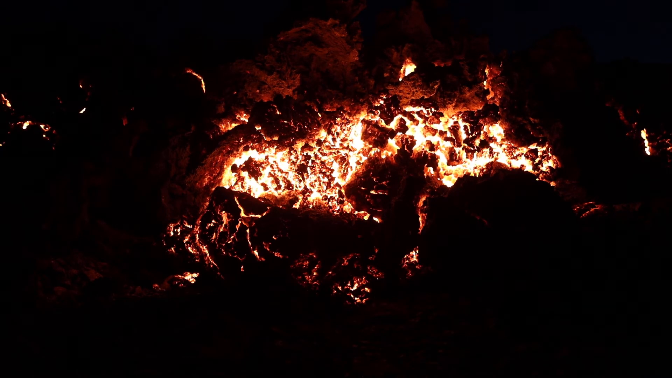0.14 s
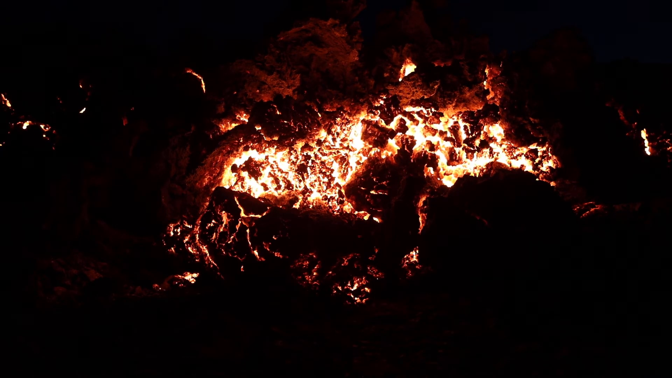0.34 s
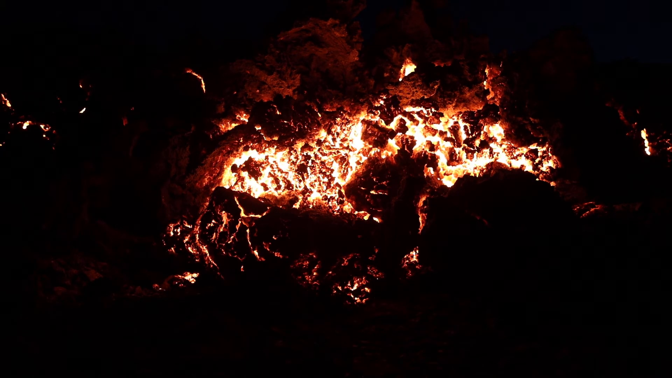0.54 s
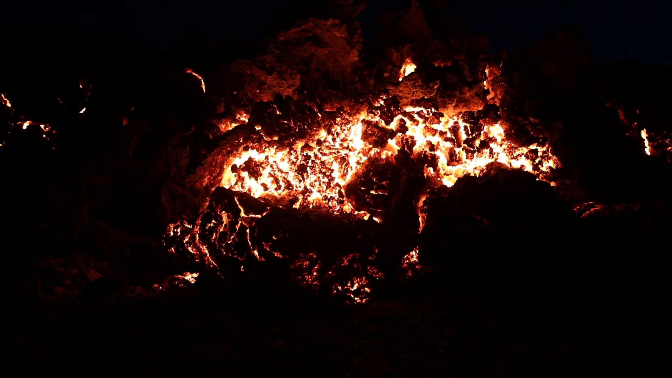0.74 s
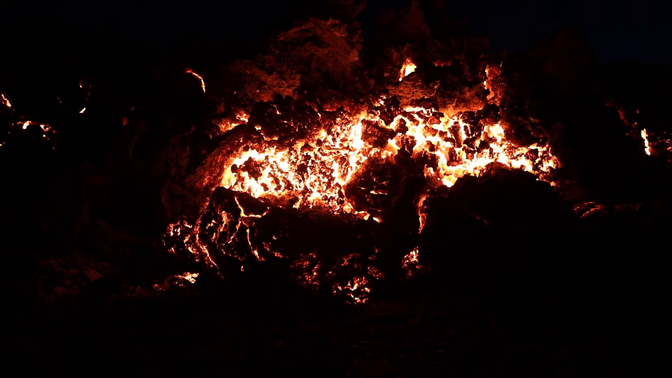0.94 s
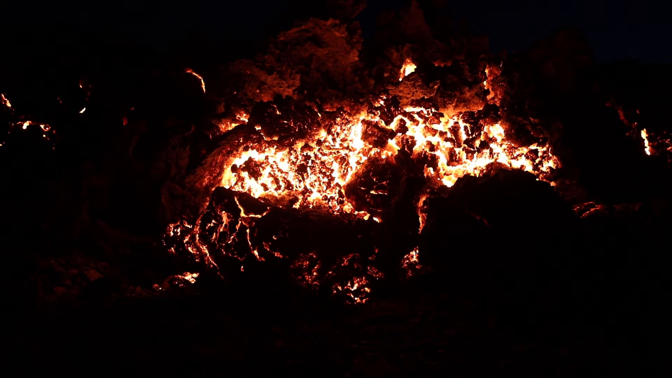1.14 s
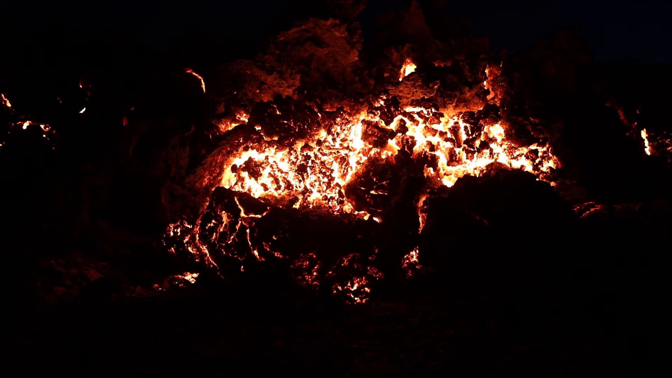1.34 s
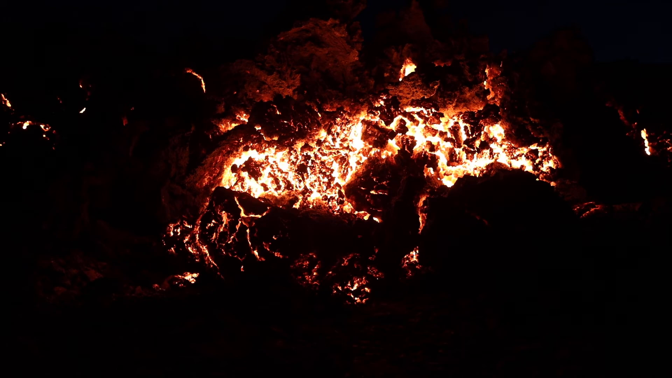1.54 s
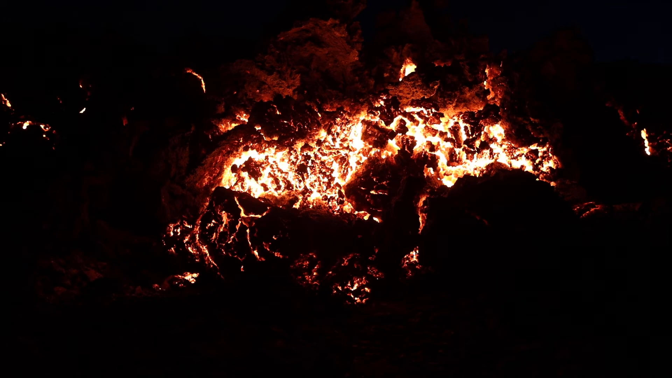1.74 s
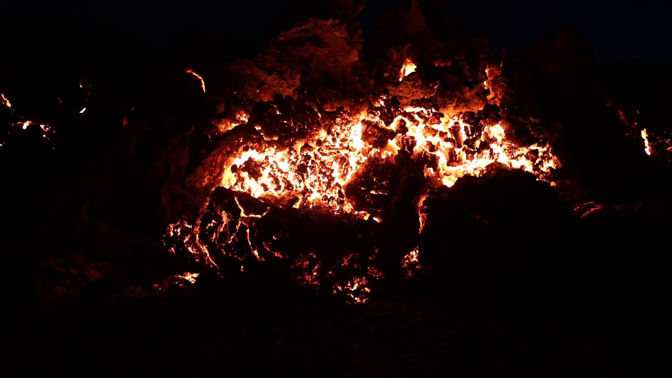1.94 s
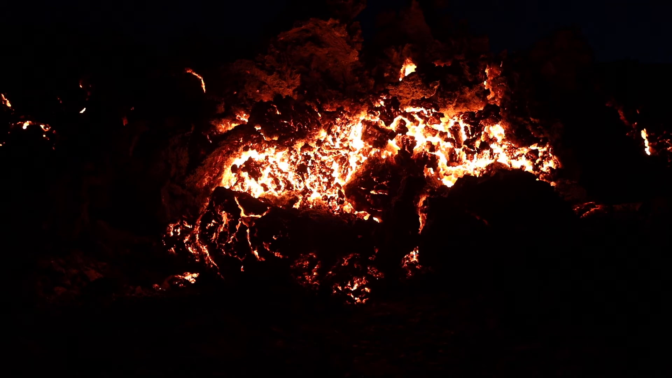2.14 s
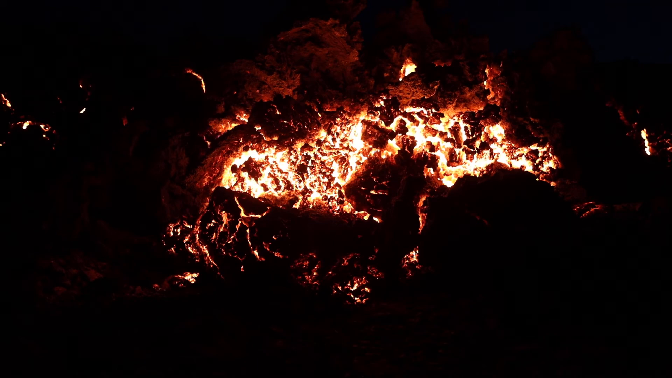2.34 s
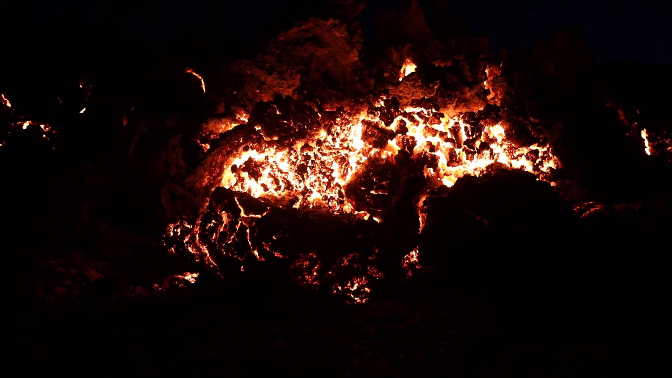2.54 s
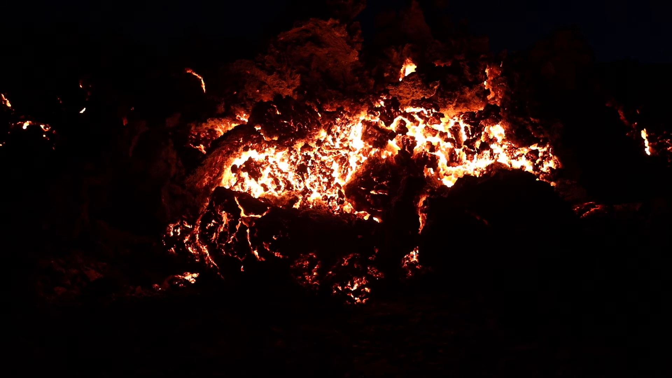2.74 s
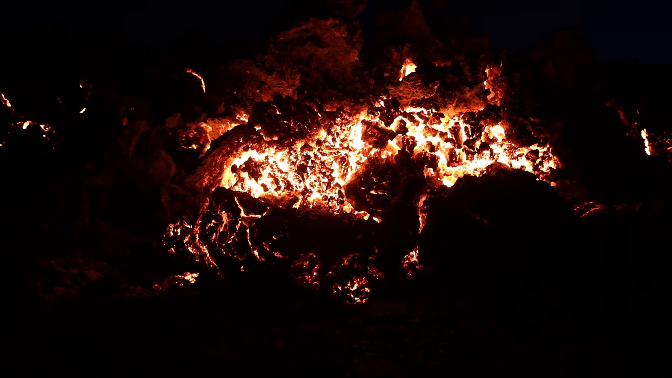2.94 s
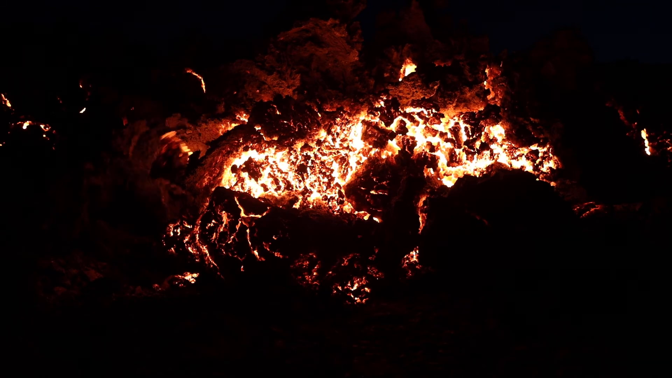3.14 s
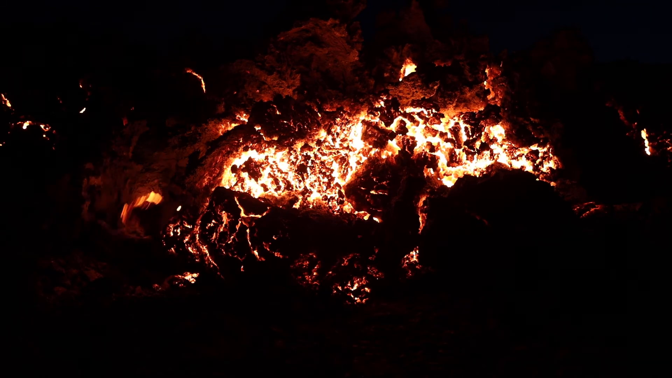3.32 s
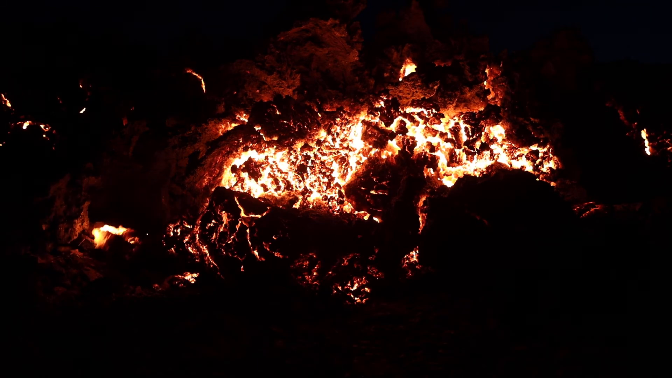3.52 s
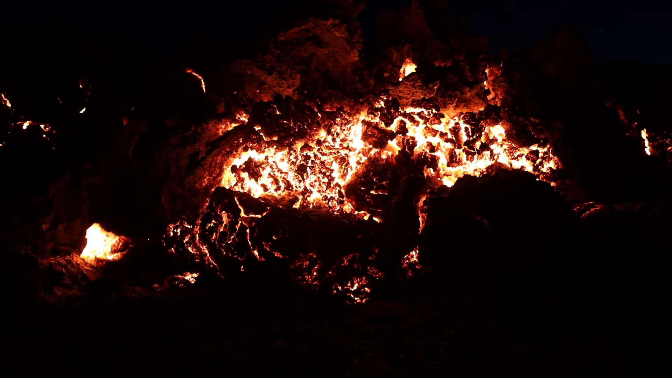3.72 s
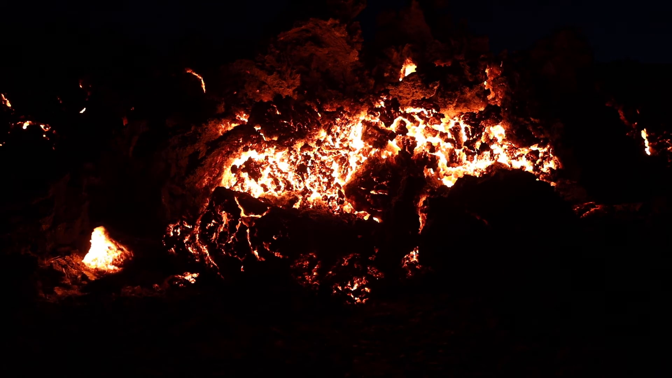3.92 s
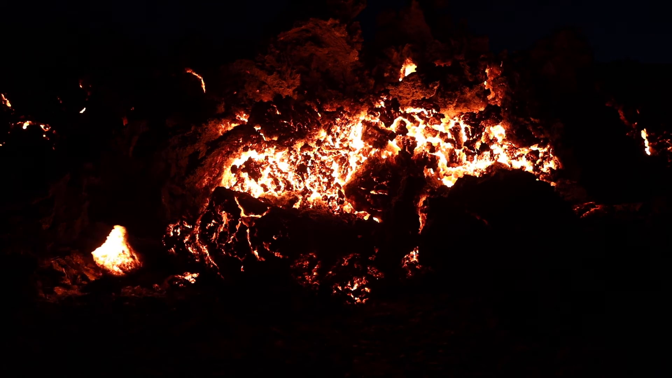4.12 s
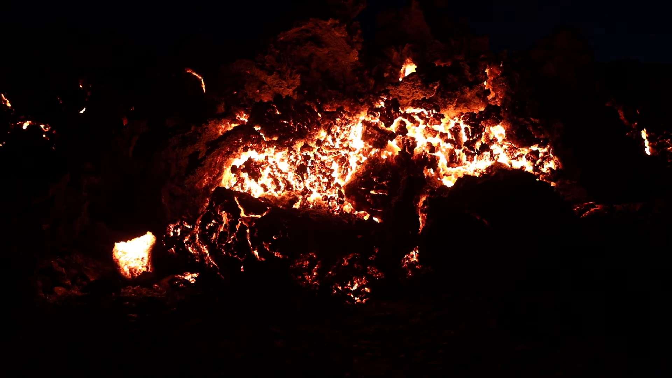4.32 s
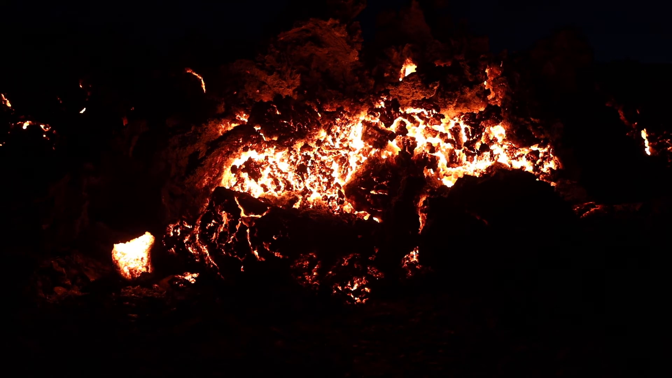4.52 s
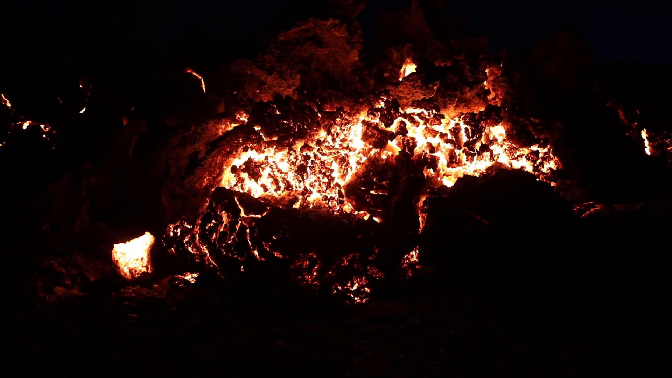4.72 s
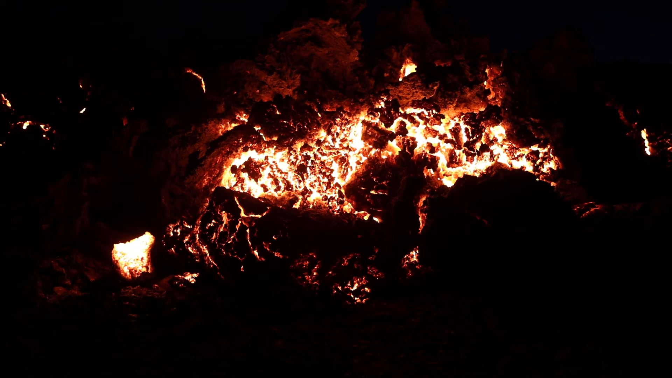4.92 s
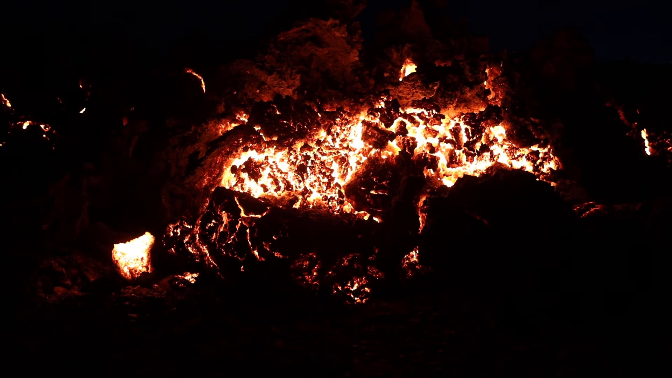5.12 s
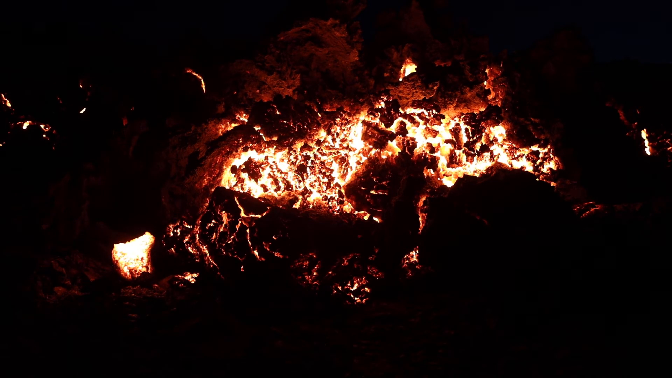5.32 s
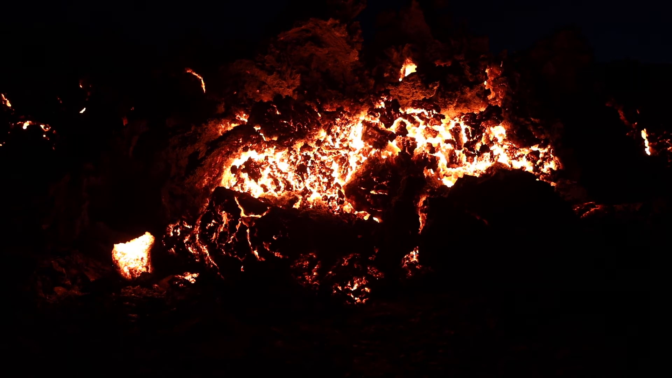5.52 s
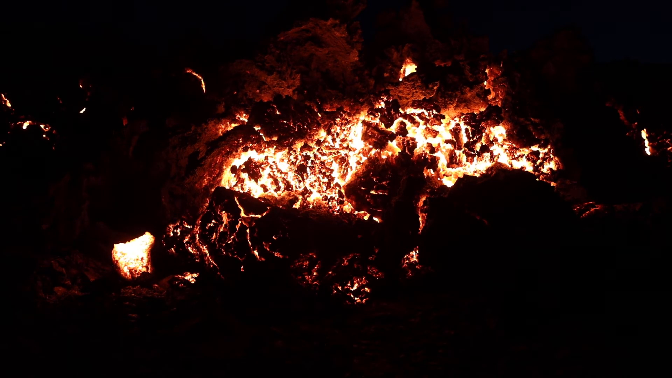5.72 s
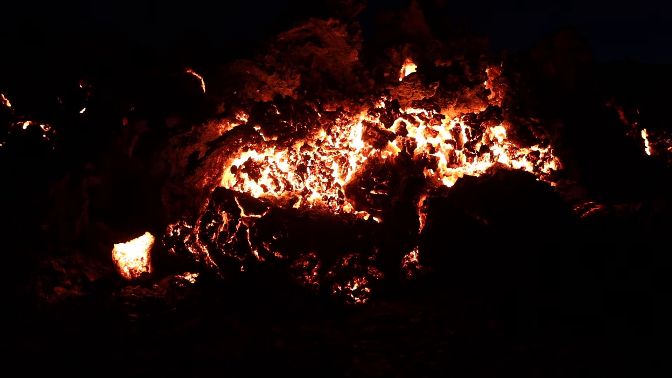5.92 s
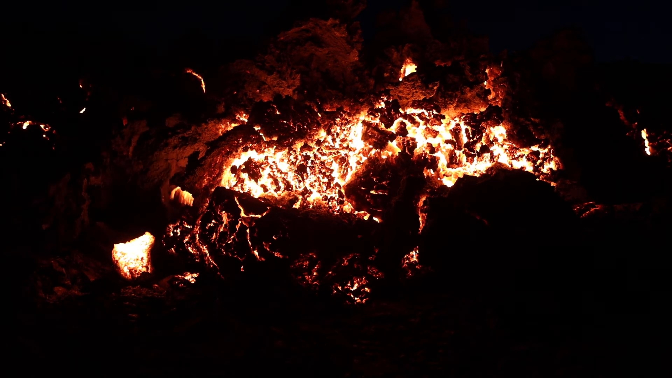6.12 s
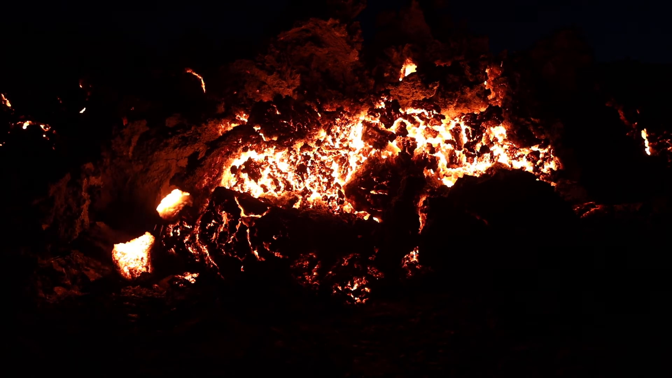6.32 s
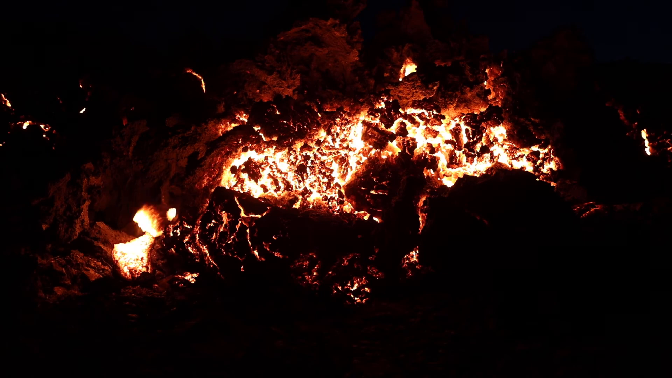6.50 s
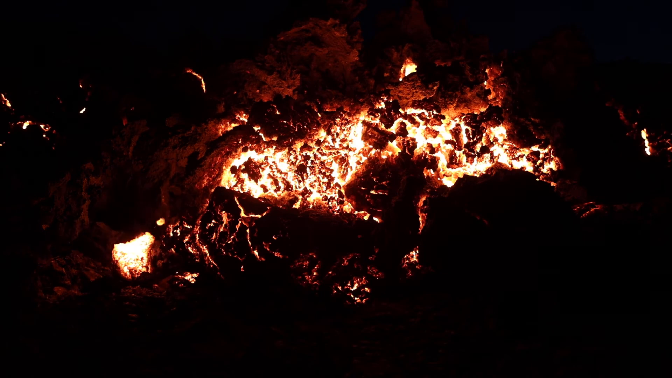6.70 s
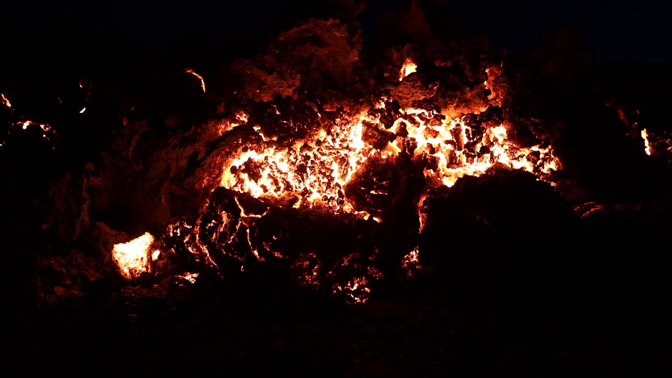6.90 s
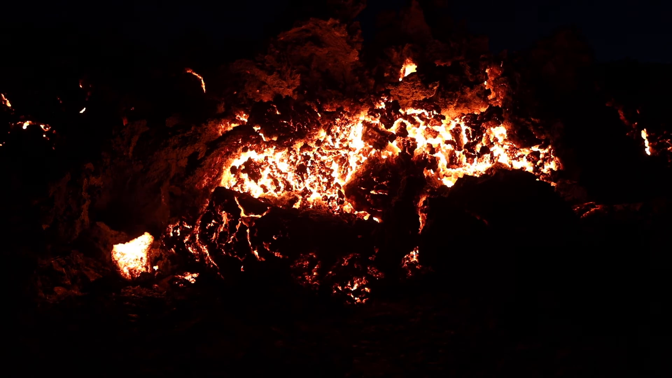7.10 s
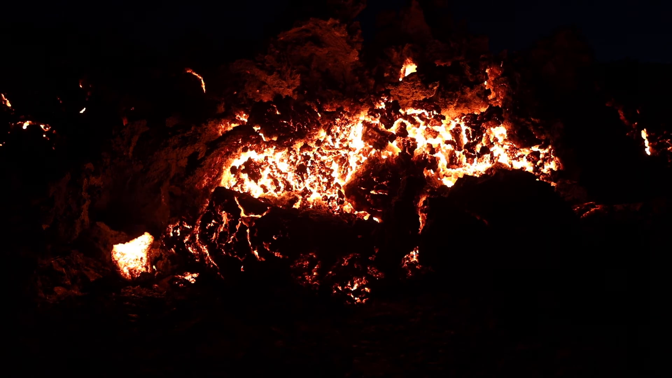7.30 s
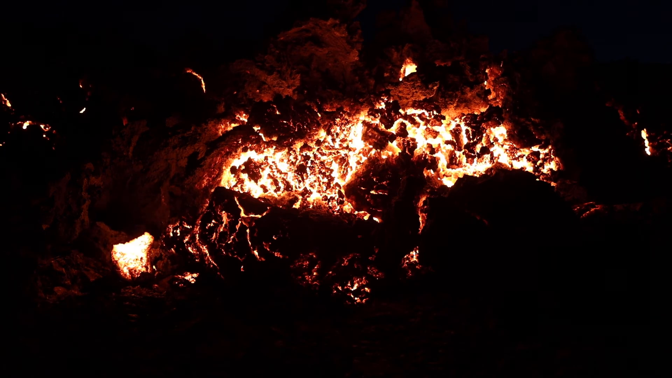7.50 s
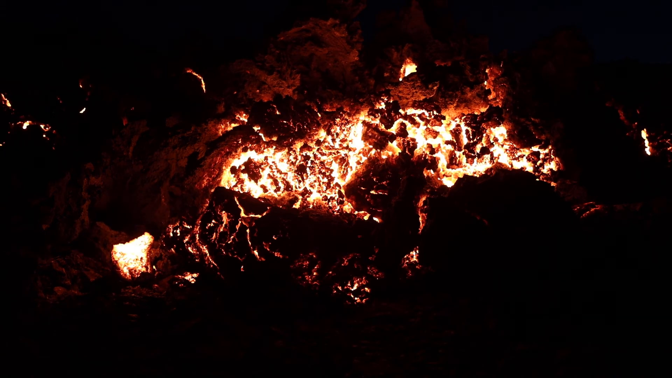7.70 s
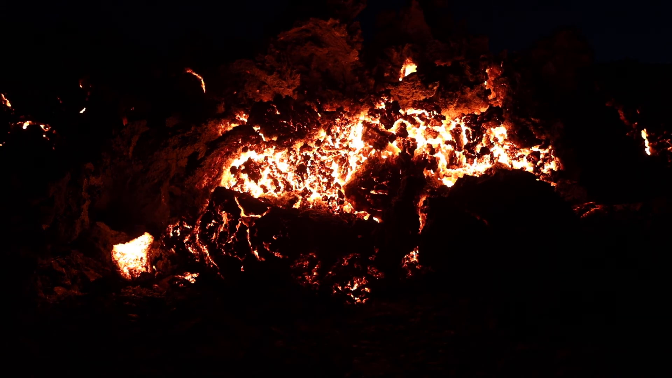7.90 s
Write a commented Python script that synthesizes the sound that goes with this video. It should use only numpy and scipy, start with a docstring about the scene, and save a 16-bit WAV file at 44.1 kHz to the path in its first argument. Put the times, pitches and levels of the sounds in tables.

```python
"""A slow lava front at night: from the start, brittle crust cracks and glassy chunks clink on rubble.
Each blow is shaped noise in four decaying bands plus dying sines; random grit and thin splinters fall
between the blows, over a patchy noise hiss and a lumpy low rumble. Near 3.4 s the heaviest falls bring a
sinking sine boom and a dull grinding noise; the grinding returns, fainter, from 6 to 7 s, as blows go on."""
import sys
import numpy as np
from scipy import signal
from scipy.fft import rfft, irfft
from scipy.io import wavfile
from scipy.ndimage import uniform_filter1d

SR = 44100
rng = np.random.default_rng(int(sys.argv[2]) if len(sys.argv) > 2 else 0)


def transcribe(signal):
    """Save signal, clipped to [-1, 1], as a 16-bit WAV file at the path in sys.argv[1]."""
    frames = np.atleast_2d(signal).T
    limited = np.clip(frames, -1, 1)
    pcm = np.round(limited * 32767).astype(np.int16)
    wavfile.write(sys.argv[1], SR, pcm)


N = 350595
SIZE = 6144  # samples in one blow; grit and chips last half as long


def gain_of(db):
    """Logarithmic level: 20 dB is a factor of ten in amplitude."""
    return 10 ** (np.asarray(db) / 20)


def evened(x):
    """Normalisation: equal mean power, rms 1, along the last axis."""
    return x / np.sqrt(np.mean(x ** 2, axis=-1, keepdims=True) + 1e-20)


def smoothed(x, size, axis=-1):
    """Low-pass by two running means: only slow variation remains."""
    once = uniform_filter1d(x, size=size, axis=axis)
    return uniform_filter1d(once, size=size, axis=axis)


def read(points, hz):
    """Interpolation along log frequency, the scale on which pitch is heard."""
    f, value = np.transpose(points)
    return np.interp(np.log(hz + 1), np.log(f + 1), value)


def add(mix, s, sound):
    """Superposition: sums a sound into the mix from s seconds on."""
    part = mix[round(s * SR):][:len(sound)]
    part += sound[:len(part)]


def coloured(x, points):
    """Linear filtering: multiplies the spectrum of x by a curve in dB."""
    hz = np.fft.rfftfreq(len(x), 1 / SR)
    return irfft(rfft(x) * gain_of(read(points, hz)), len(x))


def activity(column):
    """Amplitude modulation: one column of the activity curve as a gain over time."""
    # restlessness of the front: (t/s, level of grit, chips and hiss before their trims/dB, rumble level/dB)
    activity_curve = [(0.0, -53, -52.5), (0.53, -50.5, -61), (1.33, -51.5, -54), (1.64, -52, -58.5),
                      (2.74, -51.5, -60), (3.12, -52, -65.5), (3.54, -45, -57), (3.78, -51.5, -61),
                      (3.96, -43.5, -49), (4.12, -47.5, -57), (6.07, -54, -63), (6.35, -49.5, -52.5),
                      (7.68, -50, -69), (7.95, -51, -53)]
    rows = np.array(activity_curve)
    return gain_of(np.interp(np.arange(N) / SR, rows[:, 0], rows[:, column]))


def lines(count, peaky_db, lumpy_db):
    """Modal density: random spectra with broad lumps and standout lines, the many rings of uneven rock."""
    re, im, size, lumps = rng.standard_normal((count, SIZE // 2 + 1, 4)).transpose(2, 0, 1)
    lumps = evened(smoothed(lumps, 50))
    return (re + 1j * im) * gain_of(peaky_db * np.clip(size, -3, 3) + lumpy_db * lumps)


def scattered(rings, size):
    """Convolution of random impulses with impulse responses: each impulse sets off one kind of ring."""
    kind = rng.integers(0, len(rings), N)
    return sum(signal.oaconvolve(size * (kind == k), ring)[:N] for k, ring in enumerate(rings))


def rumble():
    """Modulated low-band noise: it comes in lumps, a few each second."""
    # spectral weighting of the noise: (f/Hz, level/dB)
    rumble_spectrum = [(21, -43), (36, 1.5), (65, 8.5), (81, 7.5), (97, -3.5), (135, -2.5), (170, -10.5),
                       (220, -18), (370, -120)]
    lumps = evened(smoothed(rng.standard_normal(N), 5000))
    noise = coloured(rng.standard_normal(N), rumble_spectrum)
    return activity(column=2) * evened(gain_of(2.6 * lumps) * noise)


def hiss(patchy_db=2.8):
    """Incoherent summation: far crackle merges into noise, patchy in time and frequency."""
    # spectral weighting of the noise: (f/Hz, level/dB)
    hiss_spectrum = [(76, -1), (130, 9), (520, -2.5), (1140, 4.5), (2050, -8.5), (3830, -12), (8230, -22.5),
                     (12000, -11.5), (16000, -39)]
    frames, hz = N // 128 + 5, np.fft.rfftfreq(512, 1 / SR)
    re, im, patches = rng.standard_normal((frames, 257, 3)).T
    patches = uniform_filter1d(uniform_filter1d(patches, size=12, axis=0), size=12, axis=1)
    weights_db = read(hiss_spectrum, hz)[:, None] + patchy_db * evened(patches)
    noise = signal.istft((re + 1j * im) * gain_of(weights_db), nperseg=512, noverlap=384)[1][:N]
    return gain_of(-11.5) * activity(column=1) * evened(noise)


def grit(per_s=190., spread_db=4.0, count=24):
    """Random impact train: small pieces drop; each kind has its own rings, tilt and decay."""
    # spectral weighting before each kind's tilt: (f/Hz, level/dB)
    grit_spectrum = [(150, 2), (500, 0.5), (1500, 4), (3000, -0.5), (8000, -12), (16000, -11.5)]
    t, hz = np.arange(SIZE // 2) / SR, np.fft.rfftfreq(SIZE, 1 / SR)
    tilt, slowness = rng.random((count, 2)).T[:, :, None]
    t60 = 0.015 + 0.17 * slowness ** 2  # s
    # tilt of up to 3.3 dB per octave either way, about 2 kHz
    shape = gain_of(read(grit_spectrum, hz) + 6.6 * (tilt - .5) * np.log2((hz + 1) / 2000))
    rings = evened(irfft(lines(count, peaky_db=5.0, lumpy_db=2.0) * shape, SIZE))[:, :len(t)]
    rings = rings * (1 - np.exp(-t / 0.00034)) * gain_of(-60 * t / t60)
    size = gain_of(spread_db * np.minimum(rng.exponential(1, N), 3)) * (rng.random(N) < per_s / SR)
    return gain_of(-6.0) * activity(column=1) * evened(scattered(rings, size))


def chips(per_s=16., level_db=-13.5, count=30):
    """Inharmonic modes: glassy splinters drop now and then, each with two thin rings, the upper weaker."""
    t = np.arange(SIZE // 2) / SR
    place, second, longer = rng.random((count, 3)).T[:, :, None]
    hz = 2000 * (11500 / 2000) ** np.sqrt(place)  # 2 to 11.5 kHz, mostly high
    t60 = 0.032 + 0.042 * longer  # s
    upper = second * np.sin(2 * np.pi * hz * (1.8 + 0.28 * longer) * t)
    rings = np.sin(2 * np.pi * hz * t) + upper
    # the level falls 2.5 dB per octave of pitch
    decay = gain_of(-60 * t / t60 - 2.5 * np.log2(hz / 2000))
    rings = rings * (1 - np.exp(-t / 0.00042)) * decay
    size = gain_of(3.8 * rng.standard_normal(N)) * (rng.random(N) < per_s / SR)
    return gain_of(level_db) * activity(column=1) * scattered(rings, size)


def rolls():
    """Friction noise: loose rubble rolls at the two large falls, a dull grinding that swells and fades."""
    # one level curve for each roll, before its edge fades: (t/s, level/dB)
    roll_levels = [
        [(3.36, -35.5), (3.552, -62), (3.75, -90)],
        [(6.05, -69), (6.348, -52), (6.85, -74)],
    ]
    # spectral weighting of the grinding: (f/Hz, level/dB)
    roll_spectrum = [(70, -30), (130, 7), (300, 7.5), (600, -10), (1000, -16.5)]
    out = np.zeros(N)
    for rows in roll_levels:
        s, db = np.transpose(rows)
        t = np.arange(s[0], s[-1], 1 / SR)
        grind = evened(coloured(rng.standard_normal(len(t)), roll_spectrum))
        fades = signal.windows.tukey(len(t), .2)
        add(out, s[0], gain_of(np.interp(t, s, db)) * fades * grind)
    return out


def boom(start_s=3.385, length_s=.22):
    """Phase integration of a falling frequency: the ground sounds as the heavy block settles."""
    # the sinking tone: (level before its unevenness/dB, start f/Hz, f it sinks towards/Hz)
    boom_tone = [(-43, 150., 37.7)]
    (db, start_hz, end_hz), = boom_tone
    t, out = np.arange(0, length_s, 1 / SR), np.zeros(N)
    hz = end_hz + (start_hz - end_hz) * np.exp(-t / 0.0544)
    uneven = gain_of(2.5 * evened(uniform_filter1d(rng.standard_normal(len(t)), size=900)))
    tone = np.sin(2 * np.pi * np.cumsum(hz) / SR) * signal.windows.tukey(len(t), .4)
    add(out, start_s, gain_of(db) * uneven * tone)
    return out


def clinks(t, t60, ring_hz, clear_db, bands, beat_hz=45., clearest_longer=0.92, struck_db=5.0):
    """Beating and modal excitation: a lump's clearest ring, a close pair, and the crust rings it strikes."""
    # rings of the crust, shared by all blows: (f before detuning/Hz, level against band/dB, factor on t60)
    crust_rings = [(339, -13.5, 1.03), (570, -18, 0.65), (823, -16.5, 0.72), (1390, -20, 2),
                   (2030, -7, 0.69), (2310, -8.5, 0.95), (2840, -13, 0.73), (3070, -13, 1.73),
                   (3420, -16, 1.04), (4276, -10.5, 0.91), (4775, -9, 0.69), (5580, -17, 0.91),
                   (7450, -10.5, 0.82), (8630, -21, 0.58)]
    apart, phase = rng.standard_normal((len(bands), 2)).T[:, :, None]
    first = np.sin(2 * np.pi * ring_hz * t)
    second = 0.98 * np.sin(2 * np.pi * (ring_hz + beat_hz * apart) * t + phase)
    db = np.array([read(band, hz) for band, hz in zip(bands, ring_hz)])
    out = gain_of(db + clear_db - 60 * t / (clearest_longer * t60)) * (first + second)
    for hz, ring_db, longer in crust_rings:
        # each blow reaches each ring unevenly
        struck, detune = rng.standard_normal((len(bands), 2)).T[:, :, None]
        band_db = np.array([[read(band, hz)] for band in bands])
        db = band_db + ring_db + struck_db * np.clip(struck, -2, 2)
        tone = np.sin(2 * np.pi * hz * (1 + 0.0146 * detune) * t)
        out = out + gain_of(db - 60 * t / (longer * t60)) * tone
    return out


def blows():
    """Impact and modal decay: a sharp snap, four bands dying at their own speed, a faint scattered tail."""
    # the louder blows: (t/s, level/dB, then thud, body and brightness against the third band/dB,
    # clearest ring f/Hz, its level over its band/dB, t60 before each band's factor/s)
    blow_list = [(0.014, -40, -26, -14, -19, 3560, -7, 0.091),
                 (0.06, -38.5, -11, -3, -10.5, 1040, 0.5, 0.1),
                 (0.1027, -43, -7.5, -5, -6.5, 405, -4, 0.085), (0.2082, -30, -7, -6, -13, 354, -9, 0.052),
                 (0.2576, -44.5, -12, -9, -11, 2260, 8, 0.059),
                 (0.4355, -50, -24, -6, -10, 1470, -2.5, 0.14),
                 (0.4679, -28.5, -26, -15.5, -13, 2980, -11, 0.095),
                 (0.5542, -29.5, -15, 1, -16.5, 1410, 2, 0.055),
                 (0.7556, -37, -17, -5.5, -17, 500, 2.5, 0.082),
                 (0.8074, -26, -15, -9, -13, 2840, -7, 0.076), (0.8785, -46, -13, -4.5, -7, 1340, -5, 0.1),
                 (1.0076, -45, -8, -8, -5.5, 333, -13, 0.08),
                 (1.066, -21.5, -16, -8.5, -8.5, 2440, -8, 0.092),
                 (1.1023, -28, -9.5, -7, -16.5, 1330, 1, 0.054), (1.13, -37, -18, -6, -15, 886, -4, 0.094),
                 (1.1786, -44, -8, -1.5, -29, 1370, -13, 0.098),
                 (1.2214, -46, -16, -5, -9.5, 1964, -5, 0.22),
                 (1.268, -35.5, -13, -5.5, -1, 1320, -8, 0.094),
                 (1.2983, -26, -12.5, -7.5, -9, 2845, 1, 0.11),
                 (1.3853, -42, -27, -5, -9.5, 1020, -5, 0.11),
                 (1.4462, -22, -10.5, -8, -14, 1325, -7, 0.061),
                 (1.5455, -32, -14, -6.5, -8, 2360, 2, 0.069), (1.6304, -33, -22, -12, -12, 2910, -7, 0.12),
                 (1.7477, -52, -7, 0.5, -12, 1027, 3, 0.14),
                 (1.7813, -36.5, -10, -4.5, -13, 790, -6, 0.083),
                 (1.8776, -28.5, -11.5, -11, -9, 2030, -7, 0.067),
                 (1.9429, -47.5, 1, 0, -17, 372, -5, 0.043), (1.9602, -31, -6, -8, -14.5, 370, -8.5, 0.025),
                 (2.0505, -31, -9.5, -7.5, -16, 737, -5, 0.056), (2.0904, -49, -8, 1.5, -7, 292, 7, 0.21),
                 (2.2295, -27, -23, -9, -10.5, 2860, 0, 0.071),
                 (2.2417, -29.5, -10.5, -7, -14, 364, -0.5, 0.096),
                 (2.2968, -30.5, -17, -9.5, -12, 2850, 2.5, 0.079),
                 (2.364, -52.5, -19, 2, -3, 1365, 1, 0.12), (2.4273, -41, -18, -2, -14, 931, -9, 0.035),
                 (2.6539, -38.5, -22, -14, -8.5, 1945, 3.5, 0.094),
                 (2.7176, -28, -20.5, -16, -13, 1390, -7, 0.11), (2.7781, -47, -6, -12, -6, 2030, 4, 0.055),
                 (2.8506, -52, -13, -6, -3, 1340, 6.5, 0.11),
                 (2.9135, -45.5, -16, -13, -12, 1310, 3, 0.064),
                 (3.1138, -42, -20, -8.5, -16, 1620, 3.5, 0.084),
                 (3.2026, -29.5, -16, -12, -10.5, 1390, -5, 0.068),
                 (3.2782, -41.5, -20, -5.5, -13, 1070, 3, 0.036),
                 (3.3073, -44, -25, -12, -10.5, 3100, -1, 0.22),
                 (3.3781, -39.5, -11, -3, -4, 600, -12, 0.22),
                 (3.3871, -21, -3, -3.5, -13, 660, -4.5, 0.033),
                 (3.4018, -27, -15, -10, -9.5, 640, -16, 0.21),
                 (3.4313, -16, -10, -9.5, -15, 570, 0, 0.048), (3.4914, -50, -8, -12, -1, 474, -1, 0.11),
                 (3.5316, -36, -19, -18, -10, 2000, 3, 0.13),
                 (3.5463, -18, -13.5, -13.5, -8, 6440, -12, 0.076),
                 (3.5904, -36, -20, -9, -4.5, 5670, -3, 0.069),
                 (3.6061, -32.5, -15, -5, -18, 342, -2.5, 0.043),
                 (3.6249, -25, -26, -13.5, -16, 5570, -2.5, 0.09),
                 (3.6591, -42.5, -5, -1, 3.5, 5710, -6, 0.093),
                 (3.6923, -35.5, -22, -17, -4, 2220, 9, 0.052), (3.7092, -39, -10, -4, -4, 2210, 3, 0.083),
                 (3.7734, -26, -19.5, -15.5, -15.5, 3460, 6.5, 0.064),
                 (3.81, -56.5, 5, -5, 8.5, 7460, -2.5, 0.075), (3.8375, -45.5, 5, -4, -3, 470, 3, 0.036),
                 (3.8492, -53, 11.5, 10, 0, 507, 8.5, 0.035), (3.901, -48, -10, 5.5, -19, 960, 7.5, 0.03),
                 (3.92, -30, -21, -13, -9.5, 1900, -7, 0.053),
                 (3.9335, -33.5, -22, -13, -15, 3420, 0, 0.061),
                 (3.9654, -47, -18, -6, -12, 1770, -9, 0.048), (3.998, -37, -13, -12, -15, 2000, -7, 0.11),
                 (4.0484, -46, -5, 1.5, -7, 886, -1, 0.06), (4.1951, -46.5, 4, 4, -8, 484, -3, 0.025),
                 (4.2071, -45, -11, -8, -21, 844, -7, 0.11), (4.2293, -35, -23, -33, -17, 3520, 1, 0.082),
                 (4.336, -42, -4, -2.5, -17, 853, -6, 0.11), (4.3986, -44.5, -5, -0.5, -2, 870, -6, 0.1),
                 (4.47, -30.5, -9.5, -5, -17, 830, -6, 0.048),
                 (4.4834, -26.5, -21, -16.5, -16.5, 3480, -4, 0.077),
                 (4.554, -42.5, -26, -9, -8.5, 2200, 9, 0.044),
                 (4.6617, -40.5, -12.5, -11.5, -12.5, 3140, 0, 0.12),
                 (4.7448, -43.5, -9, -5, -9, 755, 0, 0.04), (4.7567, -43, -11.5, -7, -11, 924, 0, 0.1),
                 (4.8456, -36.5, -13.5, 0, -13, 1170, 0.5, 0.054),
                 (4.8718, -42.5, -8, -4, -11, 485, -2.5, 0.072),
                 (4.996, -48, -17, -16, -8, 581, -10, 0.046), (5.0187, -53.5, -7, -3, 1, 943, 1, 0.099),
                 (5.1774, -44.5, -23, -11, -12, 800, -9, 0.19),
                 (5.2645, -43.5, -12, -5.5, -17, 793, -2.5, 0.09), (5.2942, -50, -5, -11, -4, 850, -7, 0.1),
                 (5.339, -48, -15, -9, -8, 6800, -6, 0.21),
                 (5.3935, -27.5, -23.5, -16, -14, 3500, -2, 0.082),
                 (5.4962, -53, -3.5, 2, -13, 400, -8, 0.11),
                 (5.534, -42.5, -10.5, -8.5, -9.5, 2970, 2, 0.072),
                 (5.5592, -44.5, -10, -4, -13, 347, -2.5, 0.086),
                 (5.6116, -34, -23, -11, -20, 384, -7, 0.1), (5.682, -44, -7, -2, -13, 1210, -7, 0.088),
                 (5.7938, -51.5, -13, -10, -8.5, 323, -7, 0.22),
                 (5.862, -49, -14, -12, -6, 3080, -2.5, 0.22),
                 (5.886, -38.5, -17.5, -10, -9.5, 703, -5, 0.11),
                 (5.909, -36, -28, -15.5, -8, 1020, 3, 0.075),
                 (6.0174, -54, -25, -12, -0.5, 3620, -1, 0.12),
                 (6.1115, -35.5, -8.5, -12.5, -10.5, 342, -16, 0.12),
                 (6.1348, -42, -12, -4, -9, 1725, 7.5, 0.08),
                 (6.1983, -39.5, -6, -2.5, -7, 347, -10, 0.075),
                 (6.2129, -33.5, -17, -5, -4, 1910, 3, 0.043), (6.2262, -38, -7, -3.5, -0.5, 288, 5, 0.066),
                 (6.2564, -38, -4.5, -1, -7.5, 365, -5, 0.054),
                 (6.33, -31.5, -17.5, -17.5, -13.5, 3180, -4, 0.09),
                 (6.4377, -34, -20, -4, -7, 724, -21, 0.1), (6.5134, -51, -7, -4, -1, 504, -14, 0.12),
                 (6.575, -44, -15, -16, -13, 4970, -2.5, 0.15), (6.588, -46, -8, -2.5, -6, 650, 3, 0.05),
                 (6.6356, -37, -9, -2, -4, 1010, -1, 0.075),
                 (6.6408, -35.5, -11, -5, -0.5, 7880, -6, 0.075),
                 (6.6487, -34.5, 3, 1.5, -16, 700, 4, 0.03), (6.6859, -30, -18, -9, -7.5, 1450, -13, 0.11),
                 (6.7113, -32.5, -16, -16, -18, 1760, 3.5, 0.12),
                 (6.7326, -29, -3, -2, -0.5, 5580, -2, 0.054), (6.7502, -33, -22, -6, -4, 4980, 3.5, 0.09),
                 (6.8317, -43.5, -19, -6.5, -1, 960, 2, 0.064),
                 (6.9518, -32, -10.5, -4.5, -11, 588, -3, 0.051),
                 (6.9669, -32, -12, -10, -11.5, 2010, 8.5, 0.06), (6.9996, -45, -6, -14, 1, 1660, 0, 0.047),
                 (7.0552, -54, -4.5, -10, -7, 390, -1, 0.15), (7.0967, -43, -11, -9, -12, 980, -5, 0.064),
                 (7.1606, -33.5, -23, -7.5, -38, 4110, -4, 0.069),
                 (7.2183, -52, -7, -5, 0, 6800, -2, 0.087), (7.3522, -49, -11, -20, -12, 2680, 0, 0.043),
                 (7.4384, -52.5, -18, -15, -44, 2420, 12.5, 0.048),
                 (7.5513, -48.5, -26, -12, -3, 2050, 2, 0.045),
                 (7.6875, -36, -18, -10, -8.5, 1970, -1, 0.073),
                 (7.747, -50, -30, -16, -4, 5670, -3, 0.098), (7.87, -47, -12, -4, -9, 320, 0, 0.13),
                 (7.919, -45, -20, -10, -11, 2230, -1, 0.15)]
    # bands from thud to brightness: (centre f/Hz, factor on t60, rise before contact build-up/s, level/dB)
    blow_bands = [(356, 1.28, 0.0028, 1), (1060, 1.02, 0.0029, 2.5), (2990, 0.97, 0.00049, -8.5),
                  (8730, 0.93, 0.00016, 0)]
    # spectral weighting of every blow: (f/Hz, level/dB)
    blow_spectrum = [(80, -24.5), (150, -10.5), (300, -9.5), (12000, 15.5), (16000, 10)]
    s, db, thud_db, body_db, bright_db, ring_hz, ring_db, t60 = np.transpose(blow_list)[:, :, None]
    t, hz = np.arange(SIZE) / SR, np.fft.rfftfreq(SIZE, 1 / SR)
    t60 = np.clip(t60, .02, .5)
    # contact builds up slower the more body a blow has (ms to s)
    build = np.clip(.55 * gain_of(0.4 * body_db), .15, 3) / 1000
    rings = lines(len(s), peaky_db=7.5, lumpy_db=2.8) * gain_of(read(blow_spectrum, hz))
    # other rings crowd around the clearest one
    rings = rings * gain_of(5.9 * np.exp(-(np.log((hz + 1) / ring_hz) / 0.56) ** 2))
    # crumbling contact: the level jolts from one millisecond to the next
    jolts = uniform_filter1d(rng.standard_normal((len(s), SIZE)), size=60, axis=1)
    jolts = gain_of(2.3 * evened(jolts))
    centres, sound = [band[0] for band in blow_bands], 0
    rels_db = [thud_db, body_db, 0 * db, bright_db]
    levels_db = np.hstack([rel_db + band[3] for rel_db, band in zip(rels_db, blow_bands)])
    for k, (_, longer, rise, _) in enumerate(blow_bands):
        # neighbouring bands cross over along log frequency
        share = read(list(zip(centres, np.eye(4)[k])), hz) ** 2 / np.sqrt(hz + 1)
        snap = gain_of(-3.5 - 60 * t / (0.015 * longer))
        ringing = gain_of(-60 * t / (longer * t60))
        tail = gain_of(-36 - 60 * t / 1.0)
        onset = 1 - np.exp(-t / (rise + build))
        # the thud band alone stays free of jolts
        envelope = onset * (snap + ringing + tail) * (jolts if k else 1)
        sound = sound + gain_of(levels_db[:, [k]]) * envelope * evened(irfft(rings * share, SIZE))
    bands = [list(zip(centres, row)) for row in levels_db]
    tones = clinks(t, t60, ring_hz, ring_db, bands)
    sound = sound + (1 - np.exp(-t / build)) * np.sqrt(jolts) * tones
    fade_out = signal.windows.tukey(2 * SIZE, .3)[SIZE:]
    sound = gain_of(db) * sound * fade_out
    out = np.zeros(N)
    for at, blow in zip(s[:, 0], sound):
        add(out, at, blow)
    return out


def scene():
    """Superposition of all layers in one channel."""
    return (rumble() + hiss() + grit() + chips() + rolls() + boom() + blows())[None]


def record(dry, low_hz=42, edge_hz=15900):
    """Linear filter chain: microphone colour and bass cut, then the band limit."""
    # microphone colour: (f/Hz, level/dB)
    mic_colour = [(700, 0.5), (1120, -9), (1400, -3), (2900, -4), (3800, -6), (5700, 1), (6900, -0.5),
                  (8400, 0), (10200, -8), (13700, -6.5), (15800, -9.5)]
    bass_cut = signal.butter(4, low_hz, "high", fs=SR, output="sos")
    heard = signal.sosfilt(bass_cut, coloured(dry[0], mic_colour))[None]
    band_limit = signal.firwin(511, edge_hz, window=("kaiser", 9), fs=SR)[None]
    return signal.oaconvolve(heard, band_limit, "same")


dry = scene()
out = record(dry)
transcribe(out)
```